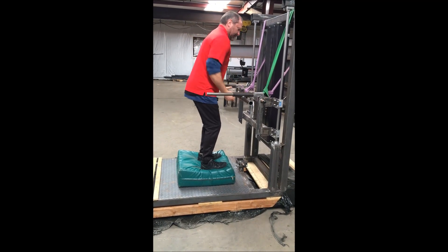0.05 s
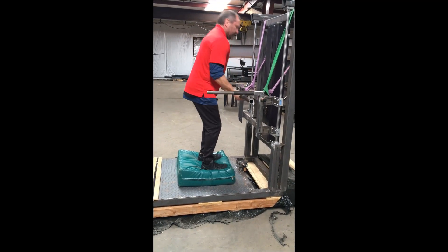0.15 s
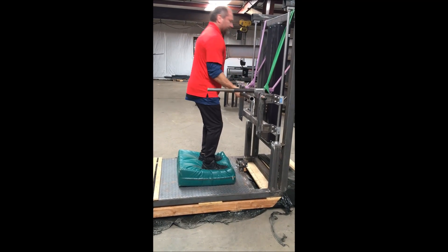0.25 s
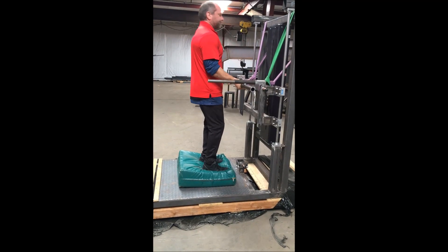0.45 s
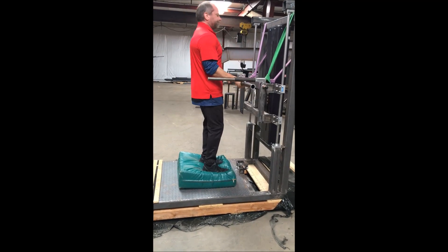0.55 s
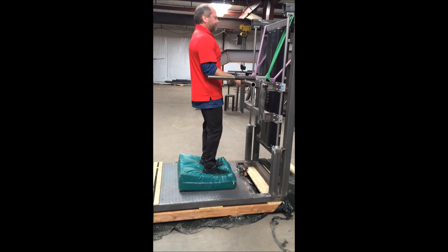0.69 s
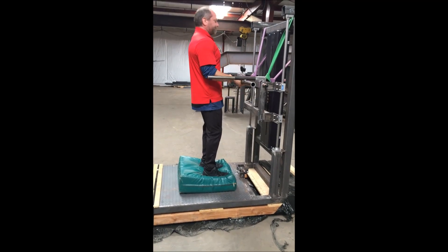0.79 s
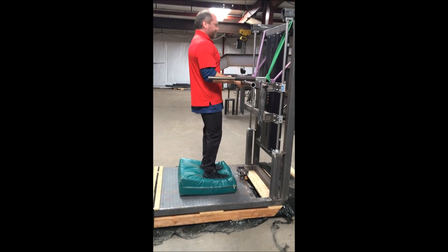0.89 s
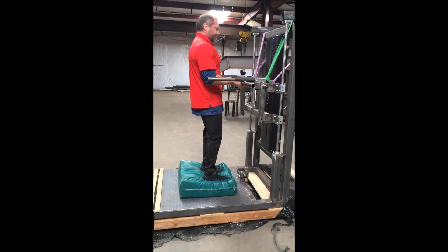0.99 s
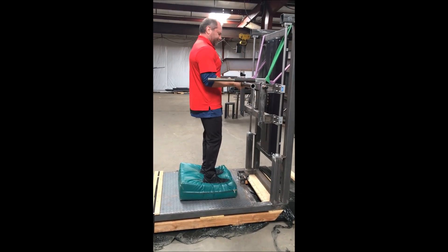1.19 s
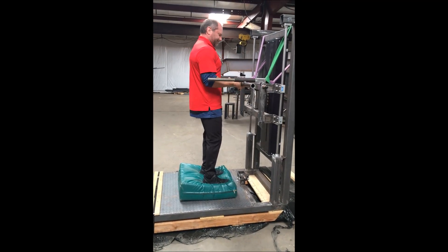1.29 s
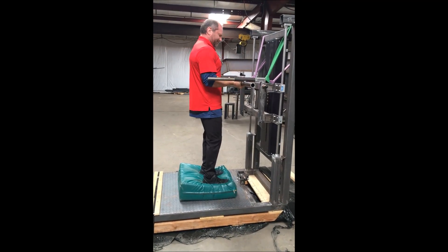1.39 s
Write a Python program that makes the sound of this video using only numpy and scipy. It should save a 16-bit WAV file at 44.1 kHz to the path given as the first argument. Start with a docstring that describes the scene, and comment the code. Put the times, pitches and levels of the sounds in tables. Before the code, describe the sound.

Two hard steel clacks from a cable weight machine echo through a large hall.

```python
"""Weight machine in a warehouse hall

A cable weight machine is pulled up: a light knock, then two hard steel clacks.
Each is a quick run of hits that sets the frame ringing and booming.
The cable hisses over its pulleys as it slows. The hall echoes on over the hum
of its ventilation and the fading sound of an earlier clatter."""
import sys
import numpy as np
from scipy import signal
from scipy.fft import rfft, irfft, next_fast_len
from scipy.io import wavfile

SR = 44100
rng = np.random.default_rng(int(sys.argv[2]) if len(sys.argv) > 2 else 0)


def store_pcm(level_fs):
    """Save levels as 16-bit WAV."""
    pcm = np.round(np.clip(level_fs, -1, 1) * 32767).astype(np.int16)
    wavfile.write(sys.argv[1], SR, np.atleast_2d(pcm).T)


N = 63945
TIME = np.arange(N) / SR

# steel hitting steel: start_s, level_db, treble_cut_hz, bass_cut_hz
HITS = [(0.0247, -15, 2630, 880), (0.0290, -9, 2140, 500), (0.2383, -3, 6000, 910), (0.2414, 2, 2660, 700),
        (0.2450, 0, 9200, 920), (0.2520, -0.5, 8100, 245), (0.3250, 1.5, 15100, 2270),
        (0.3296, 5, 9200, 417), (0.3320, 1, 4940, 317), (0.3384, -3.5, 8050, 915), (0.3500, -4, 5030, 200)]
# tone of the frame's clang: pitch_hz, level_db
CLANG_TONE = [(100, -0.5), (250, 0.5), (450, 1.5), (600, 2), (880, -3.5), (1020, 1.5), (1400, 3.5),
              (2100, -1), (2700, 0), (3100, -5.5), (3550, 2.5), (3800, -12), (4050, -1), (4900, -8),
              (5800, -6), (7000, -5), (7300, -12), (9500, -8.5), (10300, -26), (11200, -14), (12500, -19.5),
              (16000, -18)]
# how long the clang lasts (a fade is the time to drop 60 dB): pitch_hz, fade_s
CLANG_FADE = [(100, 0.78), (400, 0.56), (1200, 0.23), (2800, 0.24), (5500, 0.18), (9000, 0.16),
              (14000, 0.16)]
# tone of each hit's first snap: pitch_hz, level_db
SNAP_TONE = [(400, -11), (1100, 5.5), (2500, -9.5), (5000, -6.5), (9000, -1), (16000, -19)]
# the steel's clearest notes: pitch_hz, level_db, fade_s
STEEL_NOTES = [(354.9, -4, 0.64), (439.8, -5, 0.4), (710.3, -9, 0.43), (762, -4, 0.47), (818, -19, 1.33),
               (1072, -6, 0.15), (1237, -0.5, 0.12), (1380, -9, 0.36), (1721, -2, 0.083),
               (1879, -9.5, 0.63), (2320, -24, 0.41), (2510, -9.5, 0.48), (2725, -11, 0.19),
               (2963, -6.5, 0.31), (3418, -12.5, 0.36), (3459, -12.5, 0.58), (3606, -4.5, 0.13),
               (4054, -3.5, 0.097), (4400, -5, 0.1), (5255, -9.5, .14), (5810, -4, .13), (6520, -8, .16),
               (7010, -15, 0.11), (8380, -10, 0.14), (8770, -10.5, 0.077), (8750, -5.5, 0.13),
               (9608, -8, 0.17)]
# small parts taking the blow: start_s, pitch_hz, level_db, fade_s
SMALL_PINGS = [(0.0264, 1690, -25.5, 0.031), (0.0260, 1320, -30, 0.061), (0.2412, 1130, -24, .06),
               (0.24, 1400, -20, 0.067), (0.3234, 11050, -23, 0.033), (0.3304, 1800, -4, 0.014)]
# the load settling on frame and platform: start_s, pitch_hz, level_db, swell_s, fade_s
LOAD_BOOMS = [(0.04, 372.9, -32, 0.015, 0.2), (0.039, 454, -36, 0.0112, 0.28),
              (0.255, 250.3, -24.5, 0.018, 0.21), (0.283, 235.4, -25.5, .006, 0.19),
              (0.287, 284.4, -27, 0.0044, 0.17), (0.276, 133, -51, .02, 1.5),
              (0.365, 90, -31, 0.0091, 0.31), (0.385, 62.5, -39.5, .03, 1.2),
              (0.41, 124.9, -39, 0.011, 1.06)]
# loudness of the cable's hiss: time_s, level_db
HISS_LOUDNESS = [(0, -56.5), (.11, -61), (.17, -54), (.23, -55), (.55, -48), (.8, -53.5), (1.1, -61),
                 (1.45, -85)]
# tone of that hiss: pitch_hz, level_db
HISS_TONE = [(1000, 6.5), (3000, 2), (4500, -3), (7000, -1.5), (9500, -2), (10400, -5.5), (11300, -3),
             (16000, -8.5)]
# tone of the hall's echo: pitch_hz, level_db
ECHO_TONE = [(60, -3), (190, 10.5), (450, -0.5), (1000, 0), (2200, 2), (3400, -4), (3900, -3), (6500, -5.5),
             (9000, -3), (16000, -5.5)]
# how long the echo lasts: pitch_hz, fade_s
ECHO_FADE = [(60, 1.8), (240, 1.74), (600, 1.91), (1500, 1.26), (3000, 1.36), (6000, 1), (14000, 0.84)]
# tone of the earlier clatter: pitch_hz, level_db
CLATTER_TONE = [(300, 6), (2000, -11), (5000, -30), (16000, -45)]
# the ventilation's rumble: pitch_hz, level_db
RUMBLE_TONE = [(20, -32), (35, -2), (60, 0.5), (105, -1), (180, -6), (240, -2), (320, -21), (700, -18),
               (1300, -22.5), (2500, -33), (5000, -38), (16000, -40)]
# the ventilation's hum: pitch_hz, level_db
HUM_NOTES = [(100, -60), (151, -69), (242, -57.5)]
# how fast the hum wavers: rate_hz, level_db
HUM_WAVER = [(5.5, 0), (11, -20), (55, -90)]


def clacks(clang_db=-23, snap_db=-26, snap_fade_s=0.049):
    """Each hit gives a short snap and a clang of the frame, with its own loudness and brightness."""
    out, t = 0, TIME[:N // 2]
    for start_s, level_db, treble_hz, bass_hz in HITS:
        clang = from_db(clang_db) * dying_noise(CLANG_TONE, CLANG_FADE, size=len(t))
        snap = from_db(snap_db) * noise(SNAP_TONE, size=len(t)) * fade(t, snap_fade_s)
        hit = roll_off(clang + snap, treble_hz, "low")
        hit = roll_off(hit, bass_hz, "high")
        out += from_db(level_db) * delayed(hit, start_s)
    return out


def steel_rings(overall_db=-32.5, scatter_db=1.0):
    """Every hit adds energy to each note of the steel, and the energy leaks away."""
    start_s, hit_db, treble_hz, bass_hz = np.transpose(HITS)
    out = 0
    for hz, level_db, fade_s in STEEL_NOTES:
        strength = from_db(hit_db + scatter_db * rng.normal(size=len(HITS)))
        # a hit drives the notes between its bass and treble cuts best
        drive = 1 / np.sqrt((1 + (hz / treble_hz) ** 2) * (1 + (bass_hz / hz) ** 2))
        kicks = np.zeros(N)
        kicks[(start_s * SR).astype(int)] = (strength * drive) ** 2
        kept_per_sample = fade(1 / SR, fade_s) ** 2
        energy = signal.lfilter([1], [1, -kept_per_sample], kicks)
        wave = np.sin(2 * np.pi * (hz * TIME + rng.random()))
        out += from_db(overall_db + level_db) * np.sqrt(energy) * wave
    return out


def pings(swell_s=0.00087):
    """Pins and links ring for a moment where they are hit."""
    return sum(from_db(level_db) * delayed(note(hz, swell_s, fade_s), start_s)
               for start_s, hz, level_db, fade_s in SMALL_PINGS)


def booms():
    """The frame and platform flex as the load arrives: low notes swell, then die away."""
    return sum(from_db(level_db) * delayed(note(hz, swell_s, fade_s), start_s)
               for start_s, hz, level_db, swell_s, fade_s in LOAD_BOOMS)


def cable_hiss():
    """The cable runs over its pulleys, fastest in mid-pull."""
    level_db = np.interp(TIME, *np.transpose(HISS_LOUDNESS))
    return from_db(level_db) * noise(HISS_TONE)


def hall_echo(sound, echo_db=-48, far_wall_db=-11.5, swell_s=0.014):
    """The hall gives a long wash of echo, then a duller one comes back from the far wall."""
    near = swell(swell_s) * dying_noise(ECHO_TONE, ECHO_FADE)
    far = swell(swell_s) * roll_off(dying_noise(ECHO_TONE, ECHO_FADE), hz=2967, kind="low")
    echoes = delayed(near, start_s=0.015) + from_db(far_wall_db) * delayed(far, start_s=0.22)
    return from_db(echo_db) * signal.fftconvolve(sound, echoes)[:N]


def earlier_clatter(level_db=-45.5):
    """An earlier clatter is still dying away in the hall."""
    return from_db(level_db) * dying_noise(CLATTER_TONE, ECHO_FADE)


def ventilation(rumble_db=-47.5, waver_depth=0.3):
    """The ventilation rumbles and hums, each note wavering a little in loudness and pitch."""
    hum = 0
    for hz, level_db in HUM_NOTES:
        waver = 1 + waver_depth * (noise(HUM_WAVER) + 1j * noise(HUM_WAVER))
        hum += from_db(level_db) * np.sqrt(2) * np.real(waver * np.exp(2j * np.pi * hz * TIME))
    return hum + from_db(rumble_db) * noise(RUMBLE_TONE)


def dying_noise(tone, fades, size=N, bands=14, spread_cycles=2.6):
    """Countless notes struck at once. Each band of pitch dies away at its own rate."""
    length = next_fast_len(size, True)
    spectrum = rfft(noise(tone, size=length))
    centres_hz = np.geomspace(60, 16000, bands)
    band_position = np.interp(np.fft.rfftfreq(length, 1 / SR), centres_hz, np.arange(bands))
    out, t = 0, np.arange(size) / SR
    for k, hz in enumerate(centres_hz):
        share = np.maximum(1 - abs(band_position - k), 0)
        band = irfft(spectrum * share, length)[:size]
        rise = np.minimum(t * hz / spread_cycles, 1)  # low waves take longer to spread
        out += band * rise * fade(t, at_pitch(fades, hz))
    return out


def noise(tone, size=N):
    """Steady noise with the given tone, at an average (rms) level of 1."""
    length = next_fast_len(size, True)
    hz = np.fft.rfftfreq(length, 1 / SR)
    phases = np.exp(2j * np.pi * rng.random(len(hz)))
    sound = irfft(from_db(at_pitch(tone, hz)) * phases, length)[:size]
    return sound / np.sqrt(np.mean(sound ** 2) + 1e-20)


def note(hz, swell_s, fade_s):
    """A pure note that swells and fades."""
    return np.sin(2 * np.pi * hz * TIME) * swell(swell_s) * fade(TIME, fade_s)


def swell(swell_s):
    """Rise from 0 towards 1."""
    return 1 - np.exp(-TIME / swell_s)


def fade(t, fade_s):
    """Fall by 60 dB every fade_s seconds."""
    return np.exp(-np.log(1000) * t / fade_s)


def roll_off(sound, hz, kind):
    """A gentle filter: "low" keeps the lows, "high" keeps the highs."""
    return signal.lfilter(*signal.butter(1, hz, kind, fs=SR), sound)


def delayed(sound, start_s):
    """Place a sound in a full-length track."""
    return np.pad(sound, (int(start_s * SR), N))[:N]


def at_pitch(table, hz):
    """Read between a table's rows, spacing octaves evenly."""
    pitches_hz, values = np.transpose(table)
    return np.interp(np.log(np.maximum(hz, 1)), np.log(pitches_hz), values)


def from_db(db):
    """Turn decibels into a multiplier."""
    return 10 ** (np.asarray(db) / 20)


def scene(rings_to_hall_db=-2, booms_to_hall_db=-5):
    """The machine in its hall, in mono."""
    blows, rings, lows = clacks() + pings(), steel_rings(), booms()
    echo = hall_echo(blows + from_db(rings_to_hall_db) * rings + from_db(booms_to_hall_db) * lows)
    return (blows + rings + lows + echo + cable_hiss() + ventilation() + earlier_clatter())[None]


def record(dry, bass_cut_hz=38, treble_cut_hz=15750):
    """Turn down the deepest bass and cut off the highest treble."""
    dry = signal.sosfilt(signal.butter(4, bass_cut_hz, "high", fs=SR, output="sos"), dry)
    return signal.sosfilt(signal.ellip(12, .1, 80, treble_cut_hz, fs=SR, output="sos"), dry)


dry = scene()
out = record(dry)
store_pcm(out)
```